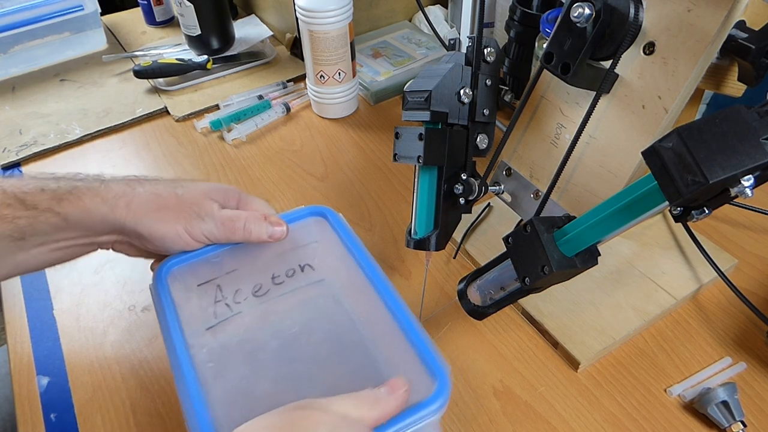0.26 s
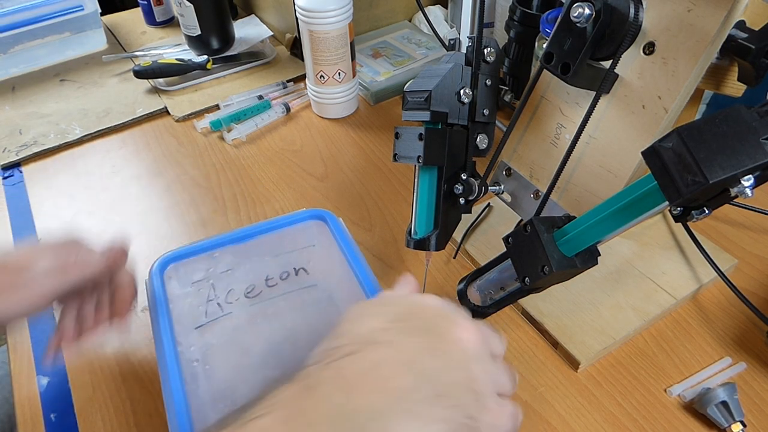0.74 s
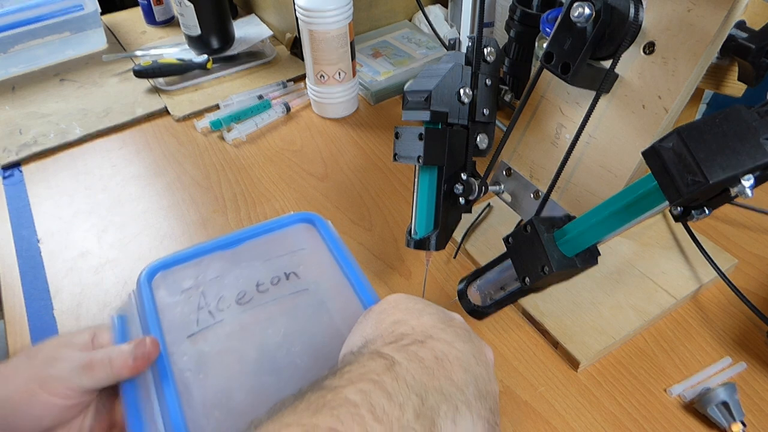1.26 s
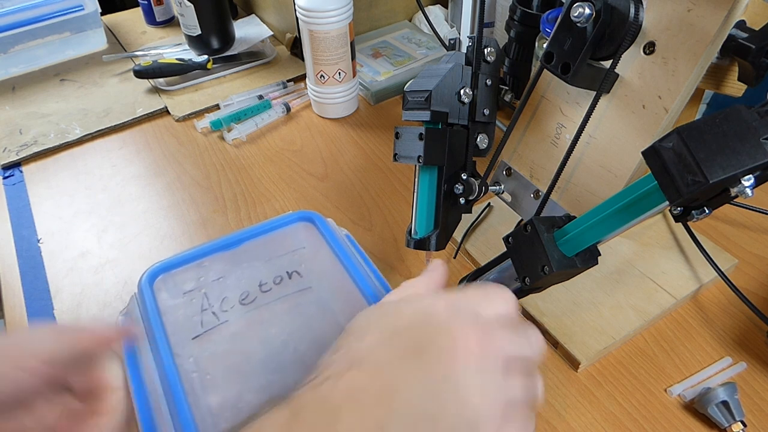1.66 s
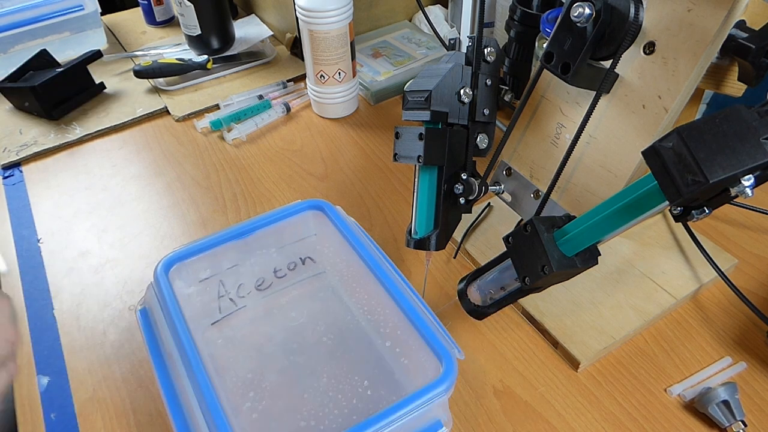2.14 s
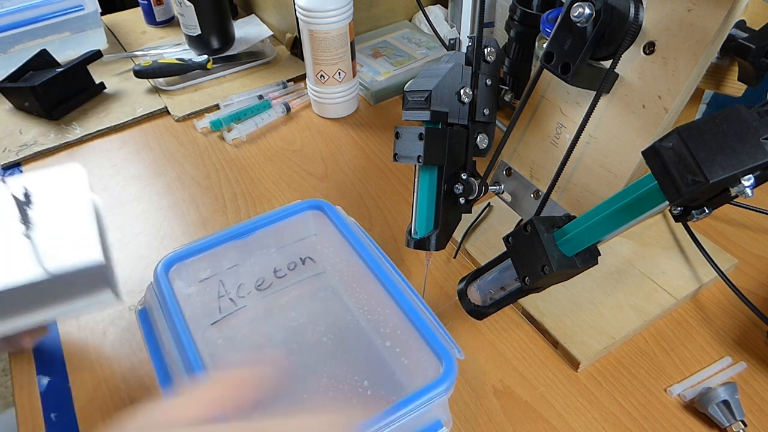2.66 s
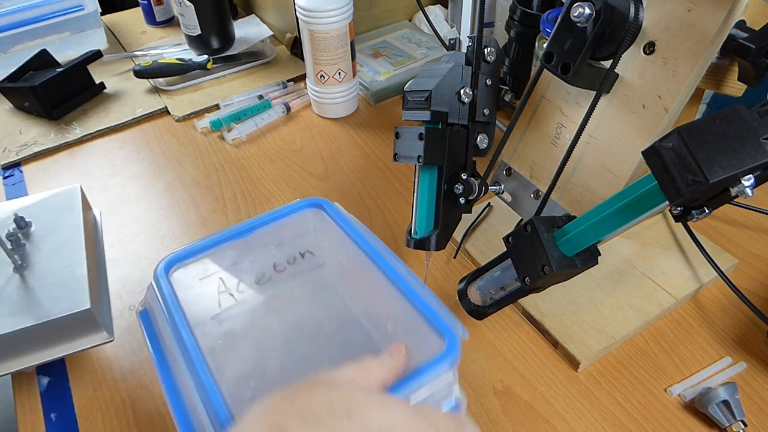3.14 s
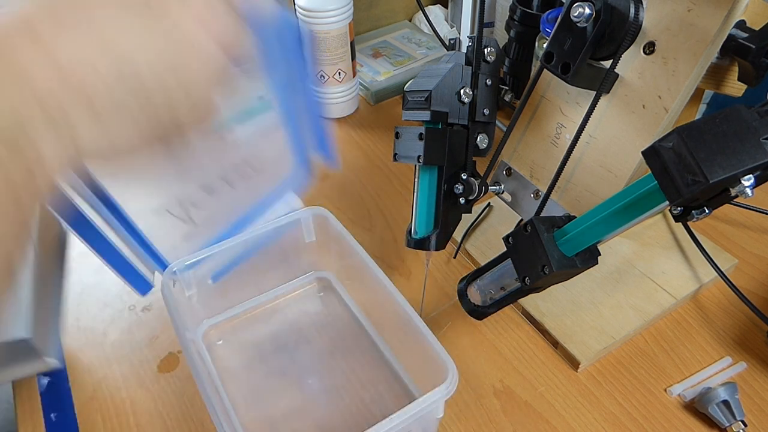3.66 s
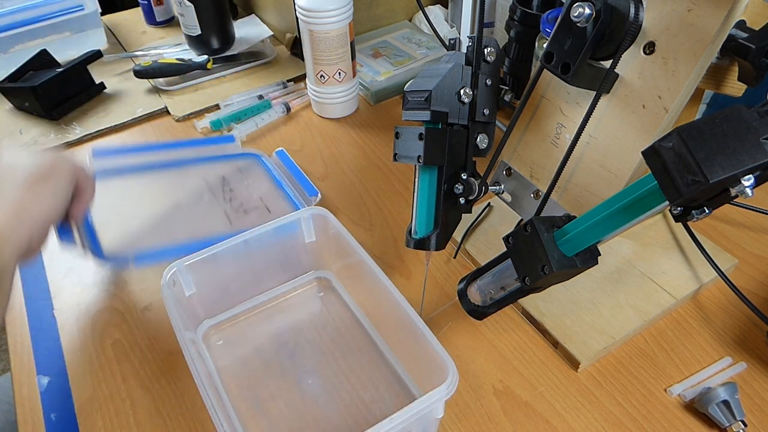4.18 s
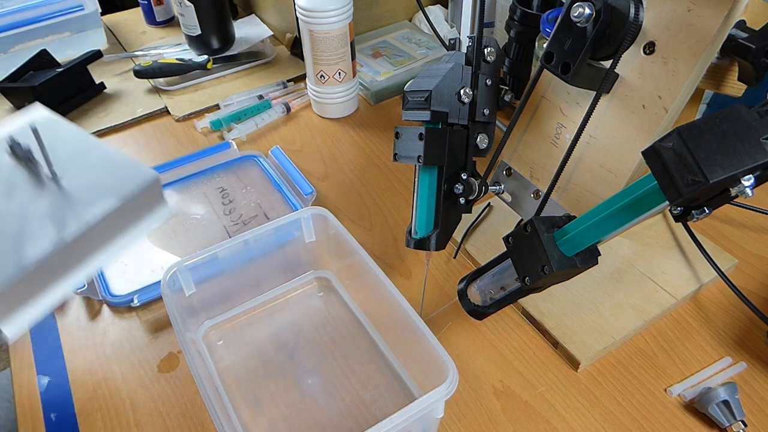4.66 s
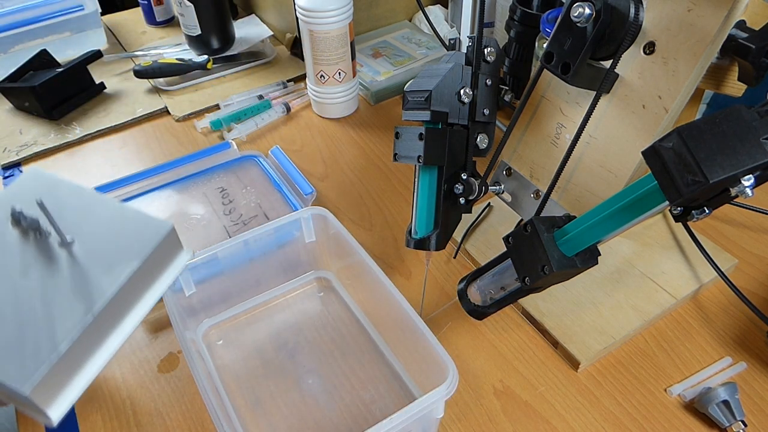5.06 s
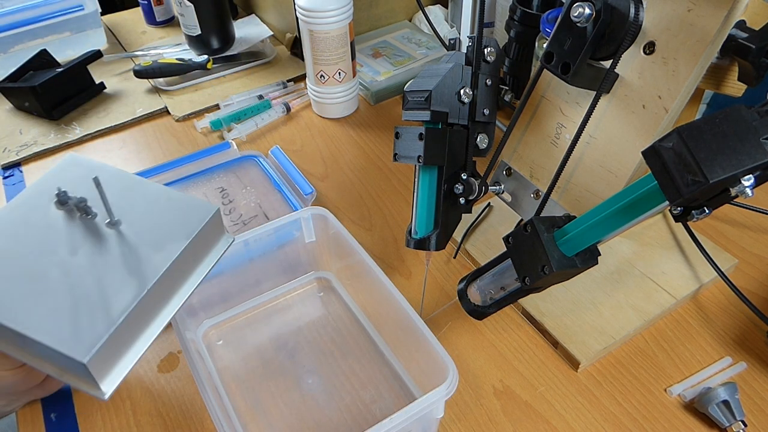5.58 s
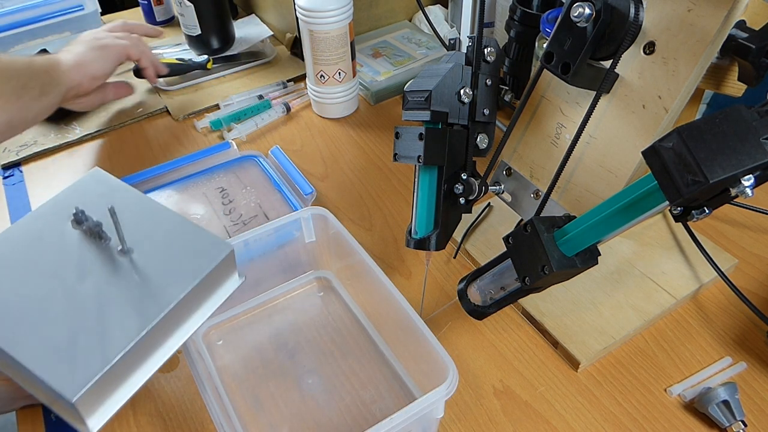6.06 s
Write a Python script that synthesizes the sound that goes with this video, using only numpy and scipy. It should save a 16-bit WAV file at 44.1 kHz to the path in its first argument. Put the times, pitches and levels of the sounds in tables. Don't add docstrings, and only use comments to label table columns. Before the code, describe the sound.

Close stereo view of a plastic box on a wooden bench in a small, lightly reverberant workshop. One loud hollow clasp snap, a pause with faint bumps, then two snaps in very quick succession. Fingers scrape and squeak on plastic, a firm knock, the lid comes off, drops, rocks faster and slaps flat. Quiet rustling follows over a faint fan hum.

```python
import sys
import numpy as np
from scipy import signal
from scipy.io import wavfile

SR = 44100
rng = np.random.default_rng(int(sys.argv[2]) if len(sys.argv) > 2 else 0)


def voltage_ratio(level):
    return 10 ** (np.asarray(level, float) / 20)


def int16_out(signal):
    q = np.round(np.clip(np.atleast_2d(signal).T, -1, 1) * 32767)
    wavfile.write(sys.argv[1], SR, q.astype(np.int16))


N = 278680
TIME = np.arange(N) / SR


def rms_one(x):
    return x / np.sqrt(np.mean(x ** 2) + 1e-20)


def at_hz(rows, hz, column=1):
    rows = np.array(rows)
    return np.interp(np.log(hz), np.log(rows[:, 0]), rows[:, column])


def band(x, low_hz, high_hz):
    edges_hz = [low_hz, min(high_hz, 0.45 * SR)]
    return signal.sosfilt(signal.butter(2, edges_hz, "band", fs=SR, output="sos"), x)


def resonance(x, hz, width_hz):
    r = np.exp(-np.pi * width_hz / SR)
    zeros = np.array([1, 0, -1]) * (1 - r * r) / 2
    return signal.lfilter(zeros, [1, -2 * r * np.cos(2 * np.pi * hz / SR), r * r], x)


def drift(rate_hz):
    knots = rng.standard_normal(int(N / SR * 40) + 2)
    return np.interp(TIME * rate_hz, np.arange(len(knots)), knots)


def bank():
    edges = 30 * 2 ** np.arange(0, 9.3, 0.4)
    return zip(edges, edges[1:], np.sqrt(edges[1:] * edges[:-1]))


def spread(mid, side, alike):
    alike = np.clip(alike, 0, 1)
    return np.sqrt(1 + alike) * mid + np.sqrt(1 - alike) * side * [[1], [-1]]


def strokes(rows, attack_s, column=3):
    t, power = TIME[::100], 0
    for row in rows:
        start, hold, fade = row[:3]
        rising = (start - t) / attack_s
        fading = np.maximum(t - start - hold, 0) / fade
        power = power + voltage_ratio(row[column] - 20 * np.maximum(rising, fading)) ** 2
    return np.interp(TIME, t, power)


def blows(events, modes, rise_cycles, focus_db, pan_db, strain_db=-60, crack_hz=2500, walls_db=-8, crack_s=0.0013):
    out, t, lead = np.zeros((2, N + 9000)), np.arange(9000) / SR, 800
    for s, peak_db, crack_db, tick_db, rattle_s, struck_hz in events:
        ring = np.zeros_like(t)
        for hz, level_db, t60 in modes:
            level_db = level_db - focus_db * np.log2(hz / struck_hz) ** 2
            swell = 1 - np.exp(-t * hz / rise_cycles)
            ring += voltage_ratio(level_db - 60 * t / t60) * swell * np.sin(2 * np.pi * hz * t)

        touching = rng.random(len(t)) < 2200 / SR
        contacts = voltage_ratio(5.4 * rng.standard_normal(len(t))) * touching * np.exp(-t / max(rattle_s, 1e-3))
        restrikes = 0.025 * contacts * rng.choice([-1, 1], len(t)) + (t == 0)
        body = signal.fftconvolve(ring, restrikes)[:len(t)]
        body *= voltage_ratio(peak_db) / max(np.abs(body).max(), 1e-3)
        walls = band(rng.standard_normal(len(t)) * np.exp(-t / 0.012), 200, 1990)
        body += voltage_ratio(peak_db + walls_db) * walls * np.minimum(t / 0.0033, 1)

        snap = np.exp(-t / crack_s) * np.minimum(t / 0.00022, 1)
        snap = snap + 0.1 * signal.lfilter([1], [1, -0.93], contacts)
        creak = voltage_ratio(strain_db) * np.exp(-t[lead:0:-1] / 0.0037)
        grit = rng.standard_normal((2, len(t))) * np.append(creak, snap[:-lead])
        crack = band(band(grit[0], crack_hz / 2.24, crack_hz * 1.53), 220, crack_hz * 7.2)
        tick = band(grit[1], 4500, 10500) * voltage_ratio([[1.2], [-1.2]])
        at = round(s * SR)
        out[:, at:at + len(t)] += body
        out[:, at - lead:at - lead + len(t)] += voltage_ratio(crack_db + 15.5) * crack + voltage_ratio(tick_db + 13.5) * tick
    return out[:, :N] * voltage_ratio([[pan_db / 2], [-pan_db / 2]])


# (time [s], peak [dB], crack about 1-5 kHz [dB], tick 4.5-10.5 kHz [dB], rattle length [s])
CLASP_SNAPS = [
    (0.1645, 0.995, -16.5, -28.5, 0.0092),
    (1.3207, 0.73, -19.5, -45, 0.017),
    (1.3749, 0.041, -16.5, -37, 0.018),
]
# (frequency [Hz], level [dB], t60 [s])
FIRST_SHELL = [(188.6, -5, 0.09), (321, 5, 0.028), (425, -3, 0.065), (496, -3, 0.068), (627, -7.5, 0.043),
               (688, 3, 0.032), (776, -2.5, 0.019), (1050, -9, 0.039), (1710, -8.5, 0.024),
               (1864, -6, 0.017), (1960, -10, 0.028)]
SECOND_SHELL = [(190, -13, .12), (275, -3, 0.064), (320.4, -4, 0.069), (476, -9.5, 0.033), (625, -7, 0.022),
                (675, -25.5, 0.085), (1020, -10, 0.017), (2120, -15, 0.054), (2150, -11, 0.097),
                (2250, -22, .04), (2900, -38, 0.022), (2980, 10, 0.014)]
THIRD_SHELL = [(181, -29, 0.093), (268, -5, 0.092), (343.5, 4.5, 0.033), (571, -13, 0.047),
               (700, -1.5, 0.017), (1040, -18.5, 0.031), (2093, -15.5, 0.029), (2458, -11.5, 0.037),
               (2546, -14, 0.05), (2670, -20, 0.047), (4140, -8, 0.021), (4310, -17.5, .035),
               (4660, -14.5, .02), (5400, -33, .025)]


def clasps():
    struck_hz = 400
    first, second, third = ([(*row, struck_hz)] for row in CLASP_SNAPS)
    out = blows(first, FIRST_SHELL, 0.82, focus_db=0.2, pan_db=-0.3, strain_db=-20.5, crack_hz=2280, walls_db=-15.5)
    out = out + blows(second, SECOND_SHELL, 1.0, focus_db=2.7, pan_db=1.9, strain_db=-18, crack_hz=2850, walls_db=-9)
    return out + blows(third, THIRD_SHELL, 1.0, focus_db=0.15, pan_db=-1.9, crack_hz=3230, walls_db=-12)


# (time [s], peak [dB], crack [dB], tick [dB], struck region [Hz])
LID_ROCKS = [
    (3.9465, -24, -24.5, -22, 900),
    (4.1285, -17, -26, -30.5, 820),
    (4.2270, -10, -32, -36.5, 1050),
    (4.2590, -7.5, -41, -37, 930),
]
# (time [s], peak [dB], crack [dB], tick [dB], rattle length [s])
FLAT_LANDING = (4.4058, -0.65, -20, -30.5, 0.014)
# (time [s], crack [dB], tick [dB], rattle length [s])
LOOSE_TICKS = [
    (3.9798, -37, -33, 0.0066),
    (3.9885, -40, -43, .006),
    (4.1408, -55, -72, .003),
    (6.2035, -44.5, -59, 0.0058),
]
# (frequency [Hz], level [dB], t60 [s])
EDGE_MODES = [(576, -7, 0.11), (730, -20, 0.049), (768, -19, 0.043), (887, 13.5, 0.037), (983, 1, 0.09),
              (1020, 3, 0.07), (1050, -1, 0.08), (1128, 8, 0.02), (1260, -12, 0.017), (1430, 6, 0.013)]
FLAT_MODES = [(357, -2, 0.024), (550, -14, 0.054), (854, -9, 0.064), (880, -1, 0.039), (908, -15.5, 0.079),
              (1016, -13, 0.065), (1093, -29, 0.076), (1260, -22, 0.081), (1425, -17, 0.031),
              (2010, -22, .025), (2384, -22, 0.018)]


def lid():
    first_rattle_s, rattle_shrink, struck_hz = 0.026, 0.66, 880
    drops = [(*row[:4], first_rattle_s * rattle_shrink ** k, row[4]) for k, row in enumerate(LID_ROCKS)]
    ticks = [(s, crack, crack, tick, rattle, struck_hz) for s, crack, tick, rattle in LOOSE_TICKS]
    landing = [(*FLAT_LANDING, struck_hz)]
    out = blows(drops[:1], EDGE_MODES, 1.0, focus_db=44, pan_db=2.5, crack_hz=3100)
    out = out + blows(drops[1:], EDGE_MODES, 1.2, focus_db=44, pan_db=2.0, crack_hz=2260)
    out = out + blows(landing, FLAT_MODES, 1.4, focus_db=2, pan_db=-0.6, crack_hz=2570, walls_db=-10.5)
    return out + blows(ticks, [], 0.9, focus_db=0, pan_db=1.5, crack_hz=3900, walls_db=-40)


# (time [s], peak [dB], crack [dB], rattle length [s], struck region [Hz])
BUMPS = [(0.435, -59, -63, 0.018, 395), (0.887, -36.5, -73, 0.0066, 190), (0.908, -36.5, -75, 0.027, 195),
         (0.948, -33, -50, 0.0095, 238), (1.009, -30.5, -66, .005, 340), (1.0185, -34, -65, 0.0047, 700),
         (1.118, -37, -77, 0.0039, 400), (2.9305, -10, -56, 0.0014, 430), (3.151, -19.5, -67, 0.0045, 290),
         (3.379, -43, -73, .006, 550), (3.470, -32, -63, .006, 426), (3.516, -37, -68, .006, 550),
         (3.666, -34, -68, .01, 500), (3.680, -40, -74, 0.022, 170), (3.7955, -25, -44, 0.0071, 554),
         (3.978, -27, -31, 0.012, 480), (6.014, -38.5, -70, 0.0089, 210)]
# (time [s], peak [dB], rattle length [s], struck region [Hz])
BENCH_THUDS = [
    (3.981, -25, 0.023, 195),
    (4.003, -32.5, 0.027, 150),
    (4.130, -15, 0.012, 510),
    (4.228, -25, .02, 540),
    (4.260, -27, 0.016, 165),
    (4.409, -26.5, 0.012, 198),
]
# (frequency [Hz], level [dB], t60 [s])
BENCH_MODES = [(144, -17, .1), (190, -2.5, 0.11), (250, -3, 0.082), (279.8, 0, 0.1), (332, 4.5, 0.033),
               (395, 5.5, 0.03), (500, -5.5, 0.073), (584, 0, 0.045), (648, -0.5, 0.024),
               (767, -5.5, 0.046), (900, 1, 0.036), (1220, -34, .03)]


def box_on_bench():
    bump_tick_db, thud_crack_db = -70, -73
    bumps = [(s, peak, crack, bump_tick_db, rattle, hz) for s, peak, crack, rattle, hz in BUMPS]
    thuds = [(s, peak, thud_crack_db, thud_crack_db, rattle, hz) for s, peak, rattle, hz in BENCH_THUDS]
    return blows(bumps + thuds, BENCH_MODES, 0.96, focus_db=16.5, pan_db=-0.2, crack_hz=1470, walls_db=-20)


# (time [s], hold [s], time to fade 20 dB [s], judder [dB], rumble [dB])
BOX_SHOVES = [(0.0, 0.02, 0.09, -45, -75), (0.3, 0.08, 0.1, -56, -72), (0.445, 0.005, 0.03, -48, -68),
              (1.5, 0.02, 0.3, -56, -64), (1.715, 0.01, 0.05, -55, -75), (1.86, 0.07, 0.13, -70, -53),
              (2.004, 0.05, 0.3, -63, -59), (3.2, 0.01, 0.11, -56, -75), (3.296, 0.01, 0.15, -64, -74),
              (3.53, 0.015, 0.08, -52, -66), (3.678, 0.015, 0.07, -64, -46), (6.02, 0.005, 0.05, -63, -53),
              (6.21, 0.01, 0.1, -55, -75)]
# (frequency [Hz], width [Hz], level [dB])
JUDDER_MODES = [(190, 13, 6), (290, 210, -5), (480, 67, -13)]


def drag():
    attack_s = 0.05
    slips = rng.standard_normal(N) * (rng.random(N) < 400 / SR)
    judder = sum(voltage_ratio(level_db) * resonance(slips, hz, width) for hz, width, level_db in JUDDER_MODES)
    jolt_hold_s, jolt_fade_s, jolt_db = 0.02, 0.08, -47
    jolts = strokes([(s, jolt_hold_s, jolt_fade_s, jolt_db) for s, *_ in BENCH_THUDS], attack_s=0.006)
    judder_gain = np.sqrt(strokes(BOX_SHOVES, attack_s))
    rumble_gain = voltage_ratio(4.0) * np.sqrt(strokes(BOX_SHOVES, attack_s, column=4) + jolts)
    return judder_gain * rms_one(judder) + rumble_gain * rms_one(resonance(slips, 120, 50))


# (time [s], hold [s], time to fade 20 dB [s], scrape [dB], swish [dB])
HAND_SLIDES = [(0.04, 0.01, 0.1, -63, -68), (0.44, 0.015, 0.12, -56, -58), (0.485, 0.01, 0.05, -52, -64),
               (1.11, 0.03, 0.06, -68, -66), (2.24, 0.04, 0.1, -66, -64), (2.4, 0.1, 0.08, -70, -68),
               (3.5, 0.15, 0.3, -70, -67), (4.525, 0.015, 0.05, -57, -56), (4.7, 0.1, 0.6, -72, -71),
               (5.42, 0.1, 0.2, -72, -70), (5.8, 0.2, 0.3, -70, -69)]
HAND_GRABS = [
    (1.655, 0.025, 0.07, -52, -55),
    (1.865, 0.12, 0.6, -70, -63),
    (2.882, 0.06, 0.08, -47.5, -57),
    (6.204, 0.03, 0.14, -49, -53),
    (6.24, 0.04, 0.3, -62, -55),
]


def hands(still_db, column):
    slides = strokes(HAND_SLIDES, 0.12, column)
    grabs = strokes(HAND_GRABS, 0.012, column)
    return np.sqrt(slides + grabs + voltage_ratio(still_db) ** 2)


# (time [s], hold [s], time to fade 20 dB [s], level [dB])
FINGER_SQUEAKS = [
    (0.438, 0.005, 0.06, -62),
    (1.674, 0.002, 0.025, -55),
    (2.25, 0.005, 0.065, -52),
]


def rustle():
    grain = voltage_ratio(2.1 * rng.standard_normal(N // 40 + 1).repeat(40)[:N])
    noise = rng.standard_normal((2, 2, N)) * grain
    scrape = rms_one(spread(*band(band(noise[0], 2800, 4600), 2700, 4900), 0.79))
    swish = rms_one(spread(*band(noise[1], 6400, 12020), 0.66))
    squeak = rms_one(resonance(noise[0, 0], 1860, 90) + 0.5 * resonance(noise[0, 0], 1800, 200))
    scrape = scrape * hands(still_db=-68, column=3)
    swish = swish * hands(still_db=-78, column=4)
    squeak = squeak * np.sqrt(strokes(FINGER_SQUEAKS, attack_s=0.04))
    return voltage_ratio(-3.0) * scrape + voltage_ratio(-0.1) * swish + squeak


# (frequency [Hz], t60 [s], level [dB], left-right likeness [0-1])
REFLECTIONS = [(98.6, 0.22, -9, 0.98), (300, 0.26, -15.5, 1), (1060, 0.24, -15, 0.84),
               (2850, .25, -12.5, 0.46), (8200, .2, -16, 0.17), (14300, .12, -5.5, 0.4)]


def workshop(x):
    t = np.arange(20000) / SR
    white, response = rng.standard_normal((2, 2, len(t))), 0
    for k, (low, high, hz) in enumerate(bank()):
        dying = voltage_ratio(at_hz(REFLECTIONS, hz, column=2) - 60 * t / at_hz(REFLECTIONS, hz))
        alike = at_hz(REFLECTIONS, hz, column=3)
        response = response + dying * spread(*band(white[k % 2], low, high), alike)
    response = response * np.clip((t - 0.003) / 0.0022, 0, 1) * voltage_ratio(-22)
    return signal.fftconvolve(x.mean(axis=0, keepdims=True), response, axes=1)[:, :N]


# (frequency [Hz], density [dB per Hz])
AIR_SPECTRUM = [(30, -5), (70, -24), (120, -8), (195, -5), (300, -6), (500, -1), (850, -7), (1500, -7.5),
                (2300, -15.5), (4700, -21.5), (5500, -21.5), (10000, -28), (13000, -20), (15500, -69)]
# (frequency [Hz], left-right likeness [0-1])
AIR_LIKENESS = [(60, 0.3), (200, 0.89), (640, 0.51), (1400, 0), (3100, 0.34), (6800, 0.18), (15000, 0.56)]


def air(level_db, patchy_db):
    out, white = 0, rng.standard_normal((2, 2, N))
    for k, (low, high, hz) in enumerate(bank()):
        gain = voltage_ratio(at_hz(AIR_SPECTRUM, hz) + patchy_db * drift(12))
        out = out + gain * spread(*band(white[k % 2], low, high), at_hz(AIR_LIKENESS, hz))
    return voltage_ratio(level_db) * rms_one(out)


# (frequency [Hz], level [dB rms])
FAN_TONES = [(215.3, -65), (425.3, -62), (651.4, -69), (855.9, -69), (1464, -72.5), (1707, -72),
             (3321, -77), (4000, -82.5), (4764, -75.5), (6202, -70.5), (7644, -130), (12199, -104)]
# (frequency [Hz], level [dB rms])
TRANSFORMER = (100, -68)


def hum(waver_db):
    out = 0
    for hz, level_db in [*FAN_TONES, TRANSFORMER]:
        waver = waver_db * drift(12) * 400 / (hz + 400)
        out = out + voltage_ratio(level_db + 2.5 + waver) * np.sin(2 * np.pi * hz * TIME + 0.6 * drift(6.7))
    return out


def scene():
    hits = clasps() + lid() + box_on_bench()
    handling = drag() + rustle()
    return hits + workshop(hits) + handling + air(level_db=-53, patchy_db=0.6) + hum(waver_db=2.5)


def band_limit(x):
    return signal.sosfilt(signal.butter(12, 16530, fs=SR, output="sos"), x)


def record(dry):
    heard = dry * voltage_ratio([[-0.3], [0.3]])
    heard = signal.sosfilt(signal.butter(4, 125, "high", fs=SR, output="sos"), heard)
    heard = signal.sosfilt(signal.butter(4, 14500, fs=SR, output="sos"), heard)
    low_noise = voltage_ratio(-78) * band(rng.standard_normal(dry.shape), 20, 90) * 10
    return band_limit(1.4 * np.tanh(heard / 1.6) + low_noise)


dry = scene()
out = record(dry)
int16_out(out)
```